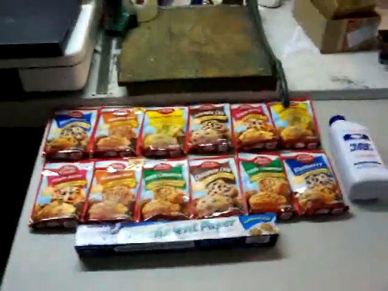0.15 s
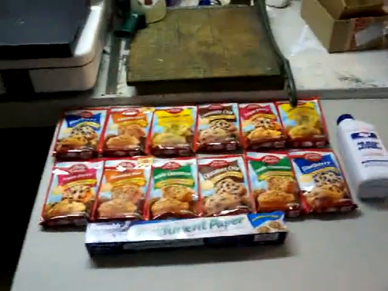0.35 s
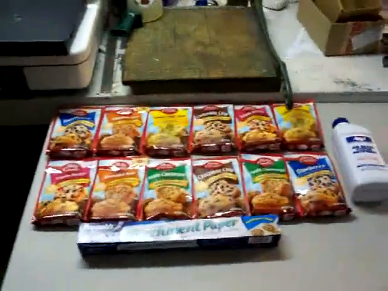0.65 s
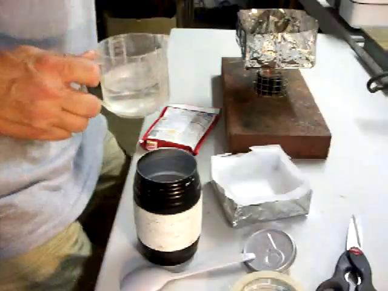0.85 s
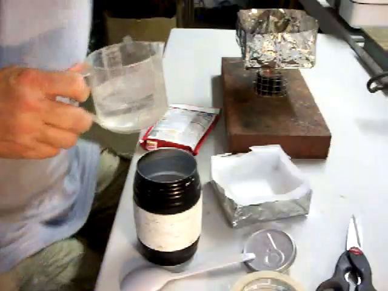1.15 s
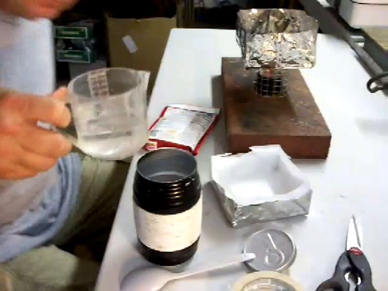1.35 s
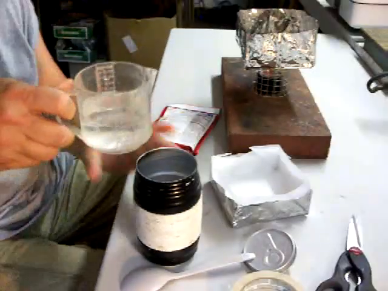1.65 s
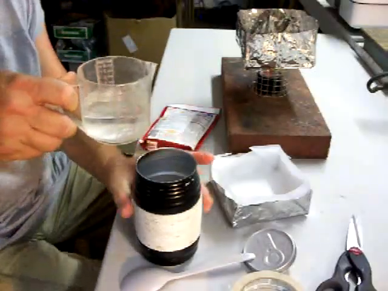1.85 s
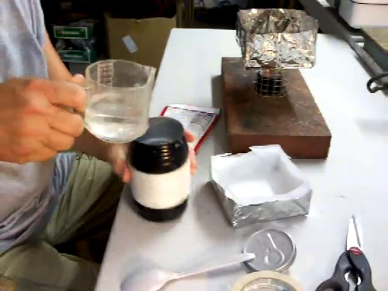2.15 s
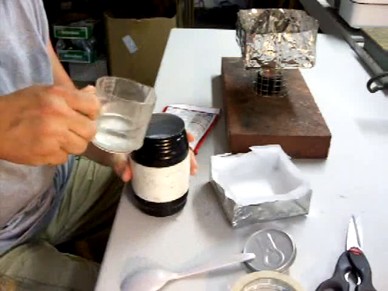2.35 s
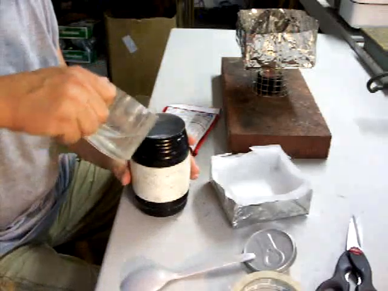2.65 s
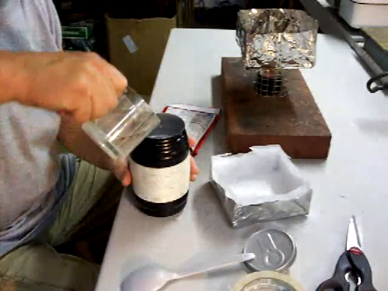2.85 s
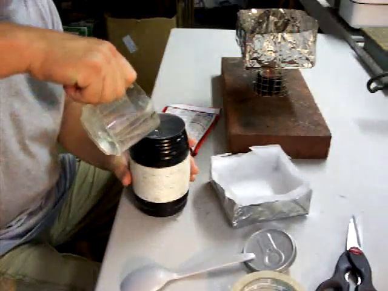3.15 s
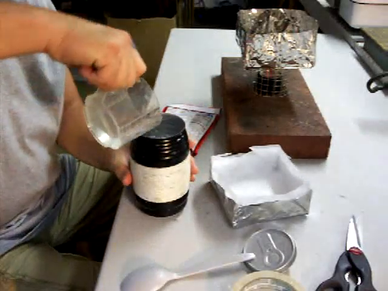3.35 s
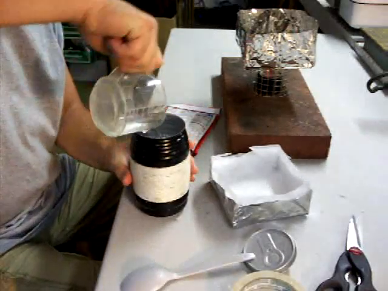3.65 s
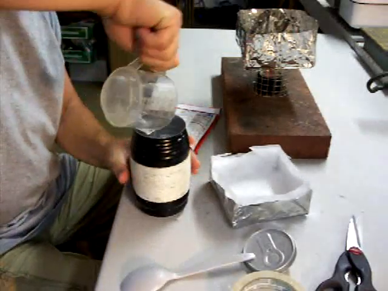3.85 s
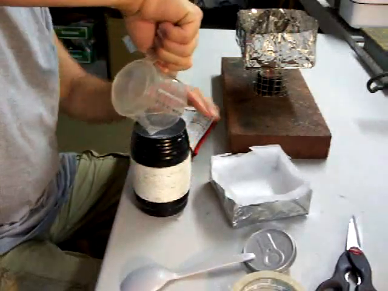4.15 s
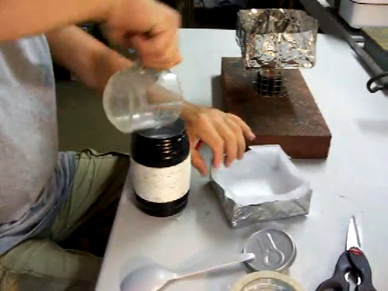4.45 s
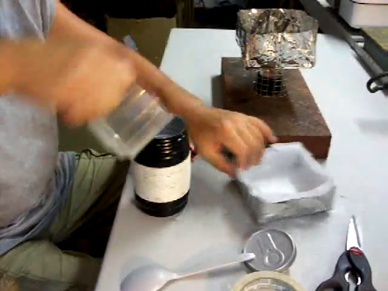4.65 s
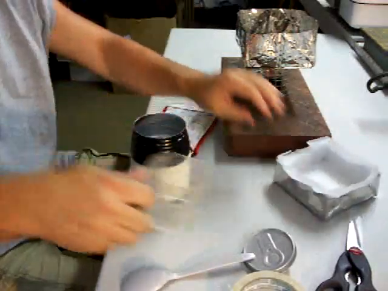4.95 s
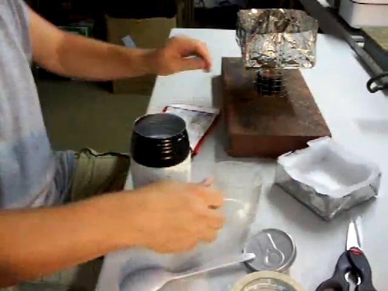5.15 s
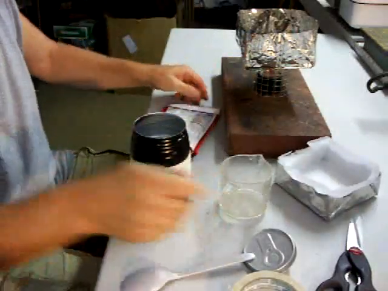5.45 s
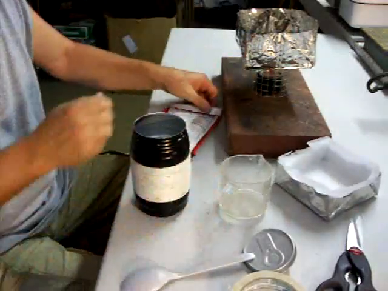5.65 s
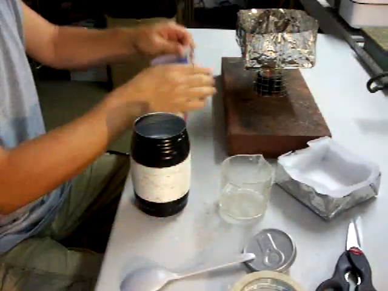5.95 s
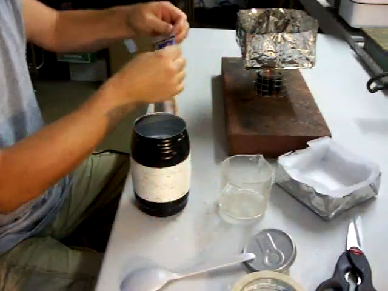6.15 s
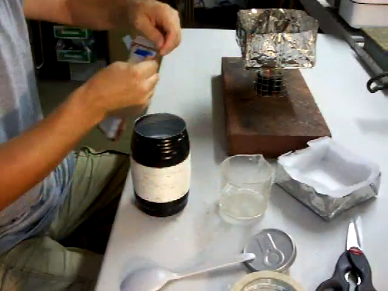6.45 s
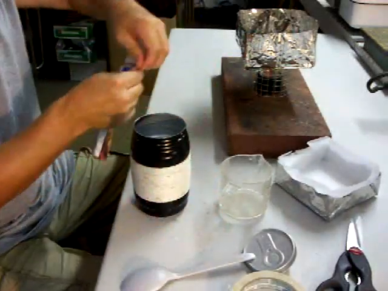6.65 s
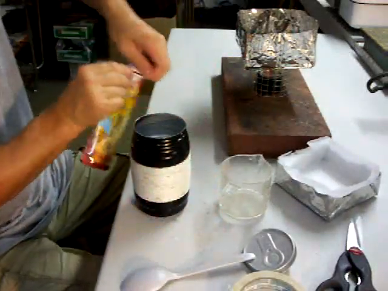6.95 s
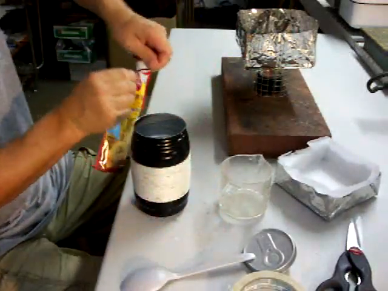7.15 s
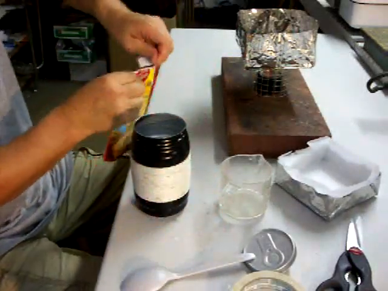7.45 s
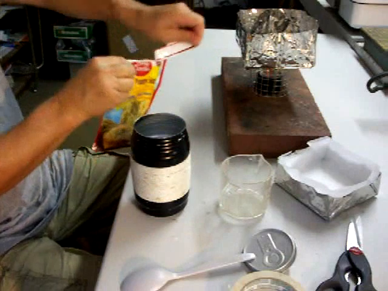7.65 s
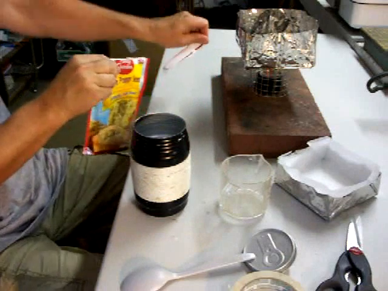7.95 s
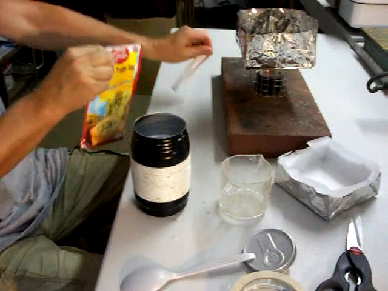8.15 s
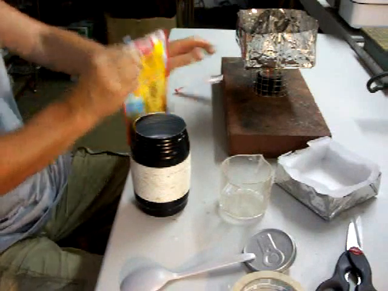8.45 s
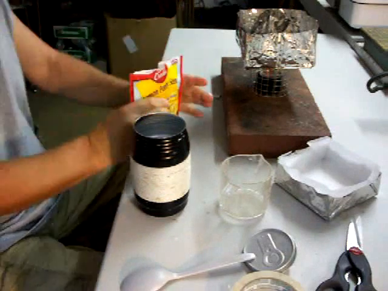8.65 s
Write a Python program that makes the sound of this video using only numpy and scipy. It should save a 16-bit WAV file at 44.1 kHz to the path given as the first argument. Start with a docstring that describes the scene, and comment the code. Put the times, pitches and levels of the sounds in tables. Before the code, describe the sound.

Quiet indoor room tone with faint hum and thin whine changes abruptly as low handling bumps and rubbing begin. A metal jar clunks onto a table, rocking hard. Water splashes into it with bright bubbles, then a foil pan rasps aside and a plastic jug knocks down. A pouch is lifted, crinkled and torn in sharp snaps. Close, slightly dull microphone.

```python
"""A pouch on a workshop table is picked up, creased and torn open: filtered friction noise and sharp snaps.
Before it a small camera is handled (low rumble, rubbing and taps), a metal jar is set down (struck modes) and
water is poured into it (ringing bubbles and spray). A foil pan is then dragged aside (friction through broad
resonances) and a plastic jug is put down (struck modes). A quiet room lies under it all: air noise with
faint fuzzy hums and a thin whine, in two shots: a short first one, then the second with all the rest."""
import sys
import numpy as np
from scipy import signal
from scipy.io import wavfile
from scipy.ndimage import uniform_filter1d

SR = 44100
rng = np.random.default_rng(int(sys.argv[2]) if len(sys.argv) > 2 else 0)


def linear_from_db(decibels):
    """Turn decibels (scalar or array-like) into linear amplitude factors; 0 gives 1."""
    return 10 ** (np.asarray(decibels, float) / 20)


def int16_out(signal):
    """Quantize to a 16-bit WAV file."""
    q = np.round(np.clip(np.atleast_2d(signal).T, -1, 1) * 32767)
    wavfile.write(sys.argv[1], SR, q.astype(np.int16))


N = 387638  # samples


def evened(x):
    """Normalisation: scales a signal to an rms of 1."""
    return x / np.sqrt(np.mean(x ** 2) + 1e-20)


def level(rows):
    """Envelope: a level in dB joined by straight lines, as a gain over time, silent outside its span."""
    rows = np.array(rows)
    t = np.arange(N) / SR
    inside = (t >= rows[0, 0]) * (t <= rows[-1, 0])
    return linear_from_db(np.interp(t, rows[:, 0], rows[:, 1])) * inside


def colour(x, points):
    """Minimum-phase filtering: the Hilbert transform of the log gain makes it causal; output rms 1."""
    f, db = np.transpose(points)
    hz = abs(np.fft.fftfreq(8192, 1 / SR))
    gain_db = np.interp(np.log(hz + 1), np.log(f + 1), db)
    log_gain = np.log(linear_from_db(np.maximum(gain_db, -100)))
    response = np.exp(np.conj(signal.hilbert(log_gain)))
    taps = np.fft.ifft(response).real[:4096]
    return evened(signal.oaconvolve(x, taps)[:len(x)])


def resonate(x, hz, width):
    """Resonance by heterodyning: shift to zero frequency, smooth, shift back; gain 1 at the centre."""
    turn = np.exp(2j * np.pi * hz * np.arange(len(x)) / SR)
    r = np.exp(-np.pi * width / SR)
    return 2 * (turn * signal.lfilter([1 - r], [1, -r], x / turn)).real


def add(mix, s, sound):
    """Superposition: sums a sound into the mix from time s."""
    part = mix[round(s * SR):][:len(sound)]
    part += sound[:len(part)]


def grit(per_s, spread_db, smooth, lumpy_db):
    """Stick-slip friction: sparse bright slips of uneven size over hiss, in patches of time and pitch."""
    slips = linear_from_db(spread_db * np.minimum(rng.exponential(1, N), 4)) * (rng.random(N) < per_s / SR)
    slips = signal.lfilter([1], [1, -.9], slips) * rng.standard_normal(N)  # each slip a short burst
    slips = signal.lfilter([1, -.7], [1], slips)  # small things snap in the treble
    z = signal.stft(evened(slips) + smooth * rng.standard_normal(N), nperseg=256, noverlap=192)[2]
    patches = uniform_filter1d(rng.standard_normal(z.shape), size=8, axis=0)
    patches = uniform_filter1d(patches, size=10, axis=1)
    z = z * linear_from_db(lumpy_db * evened(patches))
    return signal.istft(z, nperseg=256, noverlap=192)[1][:N]


SOFT_START_DB = -13  # every stroke swells from this far under its peak


def strokes(rows, over=False, faster=1):
    """Gesture envelope: levels swell, then fall linearly in dB; powers add; over adds the fifth column."""
    t, power = np.arange(N) / SR, np.zeros(N)
    for start, rise, db, fall, *more in rows:
        u = t[round(start * SR):] - start
        swell_db = SOFT_START_DB * (1 - u / max(rise, .001))
        fade_db = -abs(fall) * faster * (u - rise)
        shape_db = np.where(u < rise, swell_db, fade_db)
        power[round(start * SR):] += linear_from_db(db + (more[0] if over else 0) + shape_db) ** 2
    return np.sqrt(power)


def scattered(gain, over_db, spread_db, low_hz, high_hz, count):
    """Random point process: events (s, dB, Hz) where a source is active, sized by its gain."""
    when, size, pitch = rng.random((count, 3)).T
    active = np.flatnonzero(gain > linear_from_db(-55))
    at = active[(when * len(active)).astype(int)]
    size_db = 20 * np.log10(gain[at]) + over_db - spread_db * size
    return list(zip(at / SR, size_db, low_hz * (high_hz / low_hz) ** pitch))


def bursts(events, t60, width_share, tone):
    """Impulsive excitation: decaying noise through a resonance; tone adds a pure ring; each peak set."""
    out, t = np.zeros(N), np.arange(SR // 8) / SR
    fall = linear_from_db(-60 * t / t60)
    for (s, db, hz), noise in zip(events, rng.standard_normal((len(events), len(t)))):
        ring = np.sin(2 * np.pi * hz * t) * fall
        sound = resonate(noise * fall, hz, width_share * hz) + tone * ring
        add(out, s, linear_from_db(db) * sound / abs(sound).max())
    return out


SHOT_CUT_S = .8  # the first shot ends and the second starts
# room background, sinking and rising slowly: time_s, gain_db
ROOM_GAIN = [(0, -36), (.8, -36), (1.6, -35.5), (2.2, -38.5), (3.0, -45), (4.4, -41.5), (5.7, -49.5),
             (6.9, -50.5), (7.4, -48), (8.3, -45), (8.79, -45)]
# air noise spectra of the second and first shot: frequency_hz, relative_density_db
SECOND_SPECTRUM = [(12, -47), (20, 0.5), (75, -0.5), (157, -13), (194, 1), (273, -12), (346, -7.5),
                   (706, -14), (850, -16.5), (1640, -17), (1880, -21), (5540, -24.5), (11000, -39.5)]
FIRST_SPECTRUM = [(24, -41), (40, 0.5), (219, -6.5), (1450, -14), (1630, -15), (6740, -28.5), (10500, -41),
                  (13600, -87)]
FIRST_AIR_DB = -5  # air noise of the first shot against that of the second
# fuzzy hums against the second shot's air noise: pitch_hz, width_hz, level_db, start_s, end_s
FUZZY_HUMS = [(92, 3.1, -12.5, 0, 1.07), (219.2, 2.2, -10.5, 0, 2.3), (345, 17, -12.5, 0, .8),
              (404, 5.2, -13.5, 0, .8), (183.7, 12, -16.5, 0.84, 9.8)]
# whine partials, before the offsets below: pitch_hz, relative_level_db
WHINE_PARTIALS = [(1620, -3.5), (2428, -16.5), (4290, -20.5), (5066, -20.5)]
WHINE_FIRST_DB, WHINE_SECOND_DB = -7.5, -11.5  # whine offset in each shot
# broad rush of movement that swells as the second shot starts, then ebbs:
# start_s, rise_s, peak_level_db, fall_db_per_s
RUSH_STROKE = [(.8, 0.043, -38.5, 6.5)]
RUSH_END_S = 2.1
# scraping spectrum, shared by the rush and the settling of things: frequency_hz, relative_density_db
SCRAPE_SPECTRUM = [(47, -71), (120, -13.5), (234, -3), (287, -4.5), (615, -5.5), (1050, -14.5), (5570, -31),
                   (8590, -41), (11000, -67)]


def room_tone():
    """Noise and tones: shaped air noise, narrow-band hums and a thin whine, with one rush of movement."""
    t = np.arange(N) / SR
    first_shot = t < SHOT_CUT_S
    air = rng.standard_normal(N)
    first_air = linear_from_db(FIRST_AIR_DB) * colour(air, FIRST_SPECTRUM)
    out = np.where(first_shot, first_air, colour(air, SECOND_SPECTRUM))
    for hz, width, db, t0, t1 in FUZZY_HUMS:
        fuzz = evened(resonate(rng.standard_normal(N), hz, width))
        hum = evened(np.sin(2 * np.pi * hz * t) + fuzz)
        out += linear_from_db(db) * hum * (t >= t0) * (t < t1)
    for hz, db in WHINE_PARTIALS:  # a clean tone with a little flutter around it
        flutter = evened(resonate(rng.standard_normal(N), hz, 31.0))
        tone = np.sqrt(2) * np.sin(2 * np.pi * hz * t) + 0.15 * flutter
        out += linear_from_db(db + np.where(first_shot, WHINE_FIRST_DB, WHINE_SECOND_DB)) * tone
    rush = strokes(RUSH_STROKE) * (t < RUSH_END_S) * colour(rng.standard_normal(N), SCRAPE_SPECTRUM)
    return level(ROOM_GAIN) * out + rush


# hand on the camera; the 5.34 row is the low shake of the table under the jug:
# start_s, rise_s, rumble_level_db, fall_db_per_s, rubbing_over_rumble_db
SHAKE_STROKES = [(.799, 0.0016, -12.5, 83, -13.5), (.84, 0.035, -17, 96, -9), (.9, 0.019, -15.5, 118, -34),
                 (1.0, 0.022, -17, 92, -13), (1.14, 0.053, -31.5, 36, -4), (1.345, 0.052, -23, 138, -24),
                 (1.46, 0.041, -24, 121, -6), (1.5, 0.083, -39.5, 600, 7), (1.79, 0.028, -31, 137, -6.5),
                 (5.34, 0.05, -30, 84, -32), (8.63, 0.00084, -18.5, 113, -1)]
# low rumble and rubbed casing spectra: frequency_hz, relative_density_db
RUMBLE_SPECTRUM = [(7.1, -53), (18, 2), (33, -2), (52, 4.5), (102, -29), (144, -9.5), (302, -18.5),
                   (367, -20.5), (600, -33.5), (780, -45), (1320, -120)]
CASING_SPECTRUM = [(290, -20.5), (500, -2.5), (1240, -3), (1950, -3.5), (2700, -7), (6470, -15),
                   (9300, -30), (11000, -54)]
# knocks on the casing: start_s, peak_db, centre_hz
TAPS = [(0.845, -7.5, 1880), (0.855, -8, 1830), (0.868, -13, 1790), (0.927, -19.5, 574),
        (.928, -14.5, 2900), (1.06, -16.5, 272), (1.379, -19.5, 290), (1.495, -17.5, 540), (8.636, -9, 410)]
TAP_T60_S = 0.02
MOUNT_HZ, MOUNT_WIDTH_HZ, MOUNT_DB = 56.2, 15.5, -5.5  # wobble on the mount, level against the rumble
JOLT_S, JOLT_DB, JOLT_T60_S = 8.646, -14, 0.23  # one jolt sets the mount swinging freely
RUB_FALL_RATIO = 0.97  # fall rate of the rubbing over that of the shaking


def handling():
    """Structure-borne sound: the camera shakes, once with the table; its casing is rubbed and tapped."""
    rumble = colour(rng.standard_normal(N), RUMBLE_SPECTRUM)
    wobble = evened(resonate(rng.standard_normal(N), MOUNT_HZ, MOUNT_WIDTH_HZ))
    rumble = evened(rumble + linear_from_db(MOUNT_DB) * wobble)
    rub = colour(grit(500, 4.5, 0.7, 3.0), CASING_SPECTRUM)
    shaking = strokes(SHAKE_STROKES) * rumble
    rubbing = strokes(SHAKE_STROKES, True, RUB_FALL_RATIO) * rub
    taps = bursts(TAPS, TAP_T60_S, 0.12, 0.045)
    jolt = bursts([(JOLT_S, JOLT_DB, MOUNT_HZ)], JOLT_T60_S, 0.33, 3)
    return shaking + rubbing + taps + jolt


ECHO_T60_S = .2


def walls(x):
    """Reverberation: convolution with sparse random echoes that decay exponentially."""
    t = np.arange(SR // 3) / SR
    sparse = rng.standard_normal(len(t)) * (rng.random(len(t)) < .05)
    taps = sparse * linear_from_db(-60 * t / ECHO_T60_S) * (t > .003)
    return signal.oaconvolve(x, taps / np.linalg.norm(taps))[:N]


def rings(modes, chance):
    """Modal synthesis: decaying sines, level and pitch varied a little per strike; peak 1."""
    t, out = np.arange(SR // 3) / SR, 0
    for (hz, db, t60), c in zip(modes, chance):
        out = out + linear_from_db(db + 3 * c - 60 * t / t60) * np.sin(2 * np.pi * hz * (1 + .008 * c) * t)
    return out / abs(out).max()


def blows(events, thud, ring):
    """Impact: each blow excites the low modes of thing and table, a crack, and the thing's own ring."""
    out, t = np.zeros(N), np.arange(SR // 3) / SR
    for (s, db, crack_db, ring_db), c in zip(events, rng.standard_normal((len(events), len(t)))):
        body = evened(resonate(c, 1200, 1000))  # the crack leaves a mid-high rattle behind
        crack = c * linear_from_db(-60 * t / 0.00043) + .5 * body * linear_from_db(-60 * t / 0.069)
        own_ring = linear_from_db(ring_db) * rings(ring, c[-len(ring):])
        add(out, s, linear_from_db(db) * (-rings(thud, c) + linear_from_db(crack_db) * crack + own_ring))
    # a small table radiates no deep bass
    return signal.sosfilt(signal.butter(5, 165, "high", fs=SR, output="sos"), out)


# metal jar, then plastic jug, on the table; crack and ring are against the thud:
# start_s, thud_db, crack_db, ring_db
JAR_BLOWS = [(1.979, -14.5, -15, -10), (2.0325, -5, -23, -22), (2.0455, -1, -37, -19),
             (2.0555, -15.5, -30, -1), (2.2932, 1.5, -15.5, -6), (2.342, -1.5, -32, -38),
             (2.351, -18.5, 4.5, -11)]
JUG_BLOWS = [(5.212, -22, -0.5, -37), (5.341, 3.5, -25, -15), (5.386, -3, -35, -44), (5.4085, -6, -37, -39),
             (5.4215, 2, -22, -20), (5.4435, 0, -15, -31), (5.4515, 2, -13.5, -20), (5.476, -12, -12, -11)]
# nominal modes of each thud and each ring: pitch_hz, relative_level_db, t60_s
JAR_THUD_MODES = [(166.3, -15, 0.34), (207, -2, 0.1), (342.7, -6.5, 0.25), (450, -12.5, 0.12),
                  (552, 4.5, 0.036), (638, -2, 0.099), (775, -11, 0.073), (1136, -12, 0.024),
                  (1800, -19.5, 0.035)]
JAR_RING_MODES = [(2400, -5, 0.016), (2900, -9, 0.045), (4000, 2, 0.03), (4400, -2.5, 0.031),
                  (5500, 3.5, 0.035), (6810, -6, 0.025)]
JUG_THUD_MODES = [(239, 7, 0.079), (250, -4, 0.15), (347, 1, 0.26), (417.5, 11.5, 0.14), (480, 21.5, 0.013),
                  (591, 7.5, 0.09), (796, -5, 0.21), (1145, -4, 0.086)]
JUG_RING_MODES = [(1970, -3, 0.05), (2400, -4, 0.05), (2890, 0.5, 0.1), (2940, -0.5, 0.039),
                  (3680, -8.5, 0.22), (4850, -4, 0.044), (6020, 13, 0.0088)]
# things scraping as they settle on the table: start_s, rise_s, peak_level_db, fall_db_per_s
SETTLING_STROKES = [(1.96, 0.045, -29, 89), (2.02, 0.026, -19.5, 306), (2.293, 0.014, -16, 185),
                    (2.4, 0.032, -42, 105), (5.21, 0.0015, -36.5, 35), (5.34, 0.0064, -26, 109),
                    (5.45, 0.008, -17, 270)]


def knocks():
    """Repeated impact and friction: jar and jug rock as they land; a scrape fills in between."""
    scrape = colour(grit(710, 6, 2.0, 2.0), SCRAPE_SPECTRUM)
    jar = blows(JAR_BLOWS, JAR_THUD_MODES, JAR_RING_MODES)
    jug = blows(JUG_BLOWS, JUG_THUD_MODES, JUG_RING_MODES)
    return jar + jug + strokes(SETTLING_STROKES) * scrape


def bubbles(low_hz, high_hz, per_s, cycles, glide, count):
    """Volume pulsation of trapped air: short rings, rising slightly, at random moments and sizes; rms 1."""
    out = np.zeros(N)
    for hz in np.geomspace(low_hz, high_hz, count) * rng.uniform(0.99, 1.04, count):
        t = np.arange(int(3 * cycles / hz * SR)) / SR
        envelope = np.exp(-t * hz / cycles * 1.3) * (1 - np.exp(-t * hz / 2))
        chirp = np.sin(2 * np.pi * hz * t * (1 + glide * hz * t)) * envelope
        when = rng.random(N) < per_s / count / SR
        size = linear_from_db(4.5 * np.minimum(rng.exponential(1, N), 4))
        out += signal.oaconvolve(when * size, chirp)[:N]
    return evened(out)


BUBBLE_RISE_PER_S = 1.9  # pitch climbs by this share of its start each second


def splashes(events):
    """Entrained bubbles: each drop bursts into spray and leaves a cluster ringing round its pitch."""
    out, t = np.zeros(N), np.arange(SR // 8) / SR
    bent = t * (1 + BUBBLE_RISE_PER_S * t / 2)
    for (s, db, hz), c in zip(events, rng.standard_normal((len(events), len(t)))):
        others = sum(np.sin(2 * np.pi * hz * np.exp(0.13 * np.tanh(k)) * bent) for k in c[-4:])
        cluster = np.sin(2 * np.pi * hz * bent) + 0.58 * others
        ring = cluster * linear_from_db(-60 * t / 0.063) * np.minimum(t / 0.00065, 1)
        spray = resonate(resonate(c * linear_from_db(-60 * t / 0.028), hz, 0.6 * hz), hz, 0.6 * hz)
        sound = ring + 5 * spray
        add(out, s, linear_from_db(db) * sound / abs(sound).max())
    return out


# single large bubbles: start_s, note_level_db, start_pitch_hz
LARGE_BUBBLES = [(3.403, -31.5, 2080), (3.572, -34, 1720), (3.637, -31, 2160), (3.698, -29.5, 1734),
                 (3.845, -34, 890), (3.915, -31, 1850)]
PLOP_T60_S, PLOP_RISE_PER_S = 0.081, 2.5


def plops():
    """Bubble resonance: a note that climbs as the bubble nears the surface, with froth round it."""
    out, t = np.zeros(N), np.arange(SR // 8) / SR
    for s, db, hz in LARGE_BUBBLES:
        froth = evened(resonate(rng.standard_normal(len(t)), hz, hz / 2))
        note = np.sin(2 * np.pi * hz * t * (1 + PLOP_RISE_PER_S * t / 2)) + froth
        add(out, s, linear_from_db(db - 60 * t / PLOP_T60_S) * np.minimum(t / 0.0012, 1) * note)
    return out


# water flow: time_s, level_db
FLOW = [(3.09, -70), (3.116, -44), (3.32, -45), (3.36, -36.5), (3.72, -34), (3.88, -43), (3.905, -33),
        (4.058, -43.5), (4.13, -37), (4.21, -59), (4.32, -54)]
# fizz of fine bubbles: frequency_hz, relative_density_db
FIZZ_SPECTRUM = [(1180, 1.5), (2000, -21), (2900, -11), (4110, -8), (5750, -2.5), (6970, -2), (9200, -10.5),
                 (11000, -25)]
# the larger splashes: start_s, peak_db, start_pitch_hz
LARGE_SPLASHES = [(3.115, -24.5, 5660), (3.171, -18, 7500), (3.2035, -20, 4010), (3.3475, -15, 4850),
                  (3.3762, -19, 3680), (3.4195, -12, 6470), (3.44, -13.5, 6700), (3.4716, -14.5, 5970),
                  (3.5043, -21, 2910), (3.54, -25, 6200), (3.563, -20, 3600), (3.594, -14, 5960),
                  (3.631, -22, 4800), (3.7887, -21, 4570), (3.8242, -20, 6240), (3.902, -16, 4820),
                  (3.916, -15, 6450), (4.118, -14, 3240), (4.1487, -17.5, 5270), (4.1697, -23, 3220),
                  (4.2311, -33, 4400), (4.292, -33, 3680)]
# air in the jar knocked by jug and water: start_s, peak_db, pitch_hz
AIR_KNOCKS = [(2.844, -32, 174), (3.074, -29.5, 484), (3.21, -31, 499), (3.372, -28, 457),
              (3.944, -29.5, 552), (4.004, -30, 640), (4.056, -30, 564), (4.133, -22.5, 516)]
GLUG_T60_S = 0.22
GURGLE_DB, GURGLE_DB_PER_S = -14.5, 14.5  # gurgle against the flow, growing for two seconds as the jar fills
GURGLE_SMOOTH_S = 0.14  # span over which the gurgle averages the flow
DROP_DB, DROP_LOW_HZ, DROP_HIGH_HZ = 13, 2180, 7570  # small random drops: largest over the flow, pitch range


def water():
    """Bubble acoustics and air resonance: fizz, lower gurgle, single splashes and the jar's air note."""
    spray = evened(grit(400, 4.0, 1.7, 3.5))
    fine = bubbles(2293, 9330, 5000, 26.0, 0.00048, count=36)
    fizz = colour(fine + 0.42 * spray, FIZZ_SPECTRUM)
    coarse = bubbles(898, 3200, 3300, 9.3, 0.0013, count=16)
    wash = evened(resonate(resonate(spray, 2550, 1300), 1380, 730))
    gurgle = evened(coarse + 4.9 * wash)
    # the stream keeps the air column humming
    hollow = linear_from_db(-16.5) * evened(resonate(resonate(spray, 550, 250), 560, 270))
    flow = level(FLOW)
    pouring_s = np.clip(np.arange(N) / SR - FLOW[0][0], 0, 2)
    smooth_flow = uniform_filter1d(flow, size=int(GURGLE_SMOOTH_S * SR))
    churn = linear_from_db(GURGLE_DB + GURGLE_DB_PER_S * pouring_s) * smooth_flow
    drops = scattered(flow, DROP_DB, 35.0, DROP_LOW_HZ, DROP_HIGH_HZ, count=70)
    single = splashes(LARGE_SPLASHES + drops) + plops()
    glugs = bursts(AIR_KNOCKS, GLUG_T60_S, 0.14, 0.059)
    return flow * fizz + churn * (gurgle + hollow) + single + glugs


# foil pan pushed over the table: start_s, rise_s, peak_level_db, fall_db_per_s
DRAG_STROKES = [(4.54, 0.14, -33.5, 33), (4.625, 0.01, -35, 35), (4.68, 0.013, -29, 48.5),
                (4.73, 0.013, -19.5, 111), (4.79, 0.05, -24.5, 67), (4.882, 0.01, -21.5, 140.5),
                (4.937, 0.0034, -18.5, 141), (4.955, 0.028, -25.5, 137)]
# rasping foil: frequency_hz, relative_density_db
FOIL_SPECTRUM = [(60, -54), (160, -6), (224, -13.5), (287, 3.5), (671, -0.5), (787, -5), (1360, -14),
                 (2620, -12), (6820, -6), (9220, -56), (11000, -58)]
# broad resonances of the pan: pitch_hz, width_hz, relative_level_db
PAN_RESONANCES = [(223, 65, -2), (1000, 13, -16), (1374, 290, 1), (2240, 150, -8.5)]


def pan():
    """Friction-driven resonance: stick-slip under the foil shakes the pan's broad resonances."""
    drive = grit(700, 5.0, 0.5, 2.0)
    rasp = evened(drive) + 2 * rng.standard_normal(N)  # the base slides steadily
    body = evened(sum(linear_from_db(db) * evened(resonate(rasp, hz, width)) for hz, width, db in PAN_RESONANCES))
    return strokes(DRAG_STROKES) * evened(colour(drive, FOIL_SPECTRUM) + 1.38 * body)


# pouch handled and torn: start_s, rise_s, film_level_db, fall_db_per_s, body_over_film_db
POUCH_STROKES = [(5.794, 0.0035, -66, 121, 21.5), (5.811, 0.041, -47, 197, 1),
                 (5.878, 0.0017, -29, 337, -21), (6.015, 0.072, -40.5, 107.5, 5.5),
                 (6.118, 0.041, -28, 162, -3), (6.155, 0.036, -24, 171.5, -16),
                 (6.349, 0.049, -49.5, 219, -3), (6.958, 0.0024, -29.5, 167, -2.5),
                 (7.032, 0.012, -40.5, 69.5, 6.5), (7.079, 0.03, -35, 186.5, -21),
                 (7.206, 0.046, -46.5, 103.5, 1.5), (7.544, 0.17, -40, 53, 3.5), (7.62, 0.11, -36, 66, -16),
                 (7.68, 0.007, -42.5, 126, 7.5), (7.829, 0.068, -32, 237.5, -24),
                 (7.952, 0.0018, -34, 404, 1.5), (8.407, 0.0065, -51, 387, 14.5),
                 (8.458, 0.084, -48, 164.5, 2.5)]
GRIPPED_S = 6.7  # lifted before this, gripped and torn after
# pouch slid off the table, then torn: frequency_hz, relative_density_db
LIFT_SPECTRUM = [(88, -49), (150, -32), (271, 2), (800, -6), (1340, 4.5), (1900, -7), (2960, -20.5),
                 (5080, -14), (9030, -34.5), (11000, -33)]
TEAR_SPECTRUM = [(60, -47), (150, -10), (457, 1), (716, -2.5), (798, -0.5), (6530, -5), (8710, -17.5),
                 (11000, -26.5)]


def pouch():
    """Crackling and friction noise: bright film over the stiffer bag; first lifted, then gripped and torn."""
    drive, out = grit(1000, 5.0, .6, 1.5), 0
    lifted = [row for row in POUCH_STROKES if row[0] < GRIPPED_S]
    torn = POUCH_STROKES[len(lifted):]
    for rows, spectrum in ((lifted, LIFT_SPECTRUM), (torn, TEAR_SPECTRUM)):
        crackle = colour(drive, spectrum)
        # the body rubs more evenly than the film crackles
        steady = colour(evened(drive) + 2 * rng.standard_normal(N), spectrum)
        body = signal.sosfilt(signal.butter(4, 2500, fs=SR, output="sos"), steady)
        film = signal.sosfilt(signal.butter(4, 2500, "high", fs=SR, output="sos"), crackle)
        out += strokes(rows) * evened(film) + strokes(rows, True) * evened(body)
    return out


# the clearer snaps of foil and film, and one sharp tap on the camera at 8.63: start_s, peak_db, centre_hz
CLEAR_SNAPS = [(2.2547, -30, 2840), (2.4974, -31, 3800), (2.5563, -31, 4050), (2.6698, -30, 4200),
               (2.7463, -24.5, 4270), (4.7455, -11.5, 2380), (4.7528, -4.5, 1900), (4.8866, -6, 6000),
               (4.8956, -5, 5260), (4.9047, -8, 5200), (4.9395, -17, 5500), (4.963, -22, 5000),
               (4.9755, -10.5, 4500), (5.008, -17, 5500), (5.02, -19, 5500), (5.058, -23.5, 5500),
               (5.7985, -25.5, 1800), (5.8356, -23.5, 1940), (5.8817, -9.5, 6000), (6.163, -13, 5000),
               (6.172, -12.5, 4800), (6.185, -9, 5200), (6.199, -12, 5300), (6.208, -15, 5000),
               (6.2415, -13, 5500), (6.26, -14, 5000), (6.268, -15, 5000), (6.272, -30, 4800),
               (6.328, -20.5, 4500), (6.381, -34, 4500), (6.3953, -24.5, 3500), (6.5687, -33, 3800),
               (6.9407, -18, 4460), (6.9611, -10, 4840), (6.973, -26, 5800), (6.99, -23, 6500),
               (7.018, -29, 5000), (7.0544, -12.5, 1880), (7.073, -17, 5200), (7.1039, -15, 5200),
               (7.132, -9, 4000), (7.217, -24, 5000), (7.252, -23, 4000), (7.2606, -13, 5000),
               (7.55, -26, 3500), (7.593, -35, 5500), (7.6174, -25, 4500), (7.6332, -12.5, 5230),
               (7.679, -18, 4200), (7.6884, -21, 4100), (7.699, -18, 4500), (7.7477, -12.5, 7000),
               (7.791, -18, 5320), (7.934, -20, 2100), (7.9582, -15, 4200), (8.128, -32, 4500),
               (8.321, -29.5, 4760), (8.4124, -25, 1940), (8.6305, -6.5, 4600)]
SNAP_WIDTH, SNAP_T60_S = .7, .006  # resonance width as a share of its centre; decay of the noise driving it
# small random snaps: largest over the hand's effort, pitch range
CRINKLE_DB, CRINKLE_LOW_HZ, CRINKLE_HIGH_HZ = 11.5, 1500, 7000


def snaps():
    """Buckling: a crease flips with a wide, very short click and faint rattle; one camera tap joins them."""
    out, t = np.zeros(N), np.arange(SR // 12) / SR
    effort = np.hypot(linear_from_db(-6.0) * strokes(DRAG_STROKES), strokes(POUCH_STROKES))
    crinkles = scattered(effort, CRINKLE_DB, 13, CRINKLE_LOW_HZ, CRINKLE_HIGH_HZ, count=320)
    events = CLEAR_SNAPS + crinkles
    for (s, db, hz), c in zip(events, rng.standard_normal((len(events), len(t)))):
        rattle = 0.21 * linear_from_db(-60 * t / 0.021)
        flip = 3.8 * (t == 0) + c * (linear_from_db(-60 * t / SNAP_T60_S) + rattle)
        sound = resonate(resonate(flip, hz, SNAP_WIDTH * hz), hz, SNAP_WIDTH * hz)
        add(out, s, linear_from_db(db) * sound / abs(sound).max())
    return out


def scene():
    """Superposition: all sources, with the near ones echoed by the walls."""
    near = knocks() + water() + pan() + pouch() + snaps()
    return (near + linear_from_db(-12.0) * walls(near) + handling() + room_tone())[None]


def roll_off(x):
    """The treble ends steeply here."""
    return signal.sosfilt(signal.butter(12, 17000, fs=SR, output="sos"), x)


EDGE_HZ = 11050  # the stopband starts here


def record(dry):
    """Band limiting and clipping: the microphone rolls off the treble and overloads on the hardest blows."""
    dull = signal.sosfilt(signal.butter(3, 8200, fs=SR, output="sos"), dry)
    dull = signal.sosfilt(signal.cheby2(10, 55, EDGE_HZ, fs=SR, output="sos"), dull)
    mix = np.clip(dull, -1, 1)
    return roll_off(mix)


dry = scene()
out = record(dry)
int16_out(out)
```